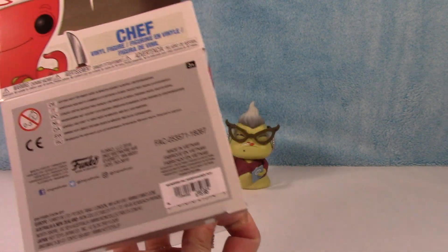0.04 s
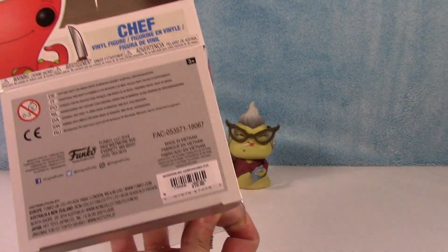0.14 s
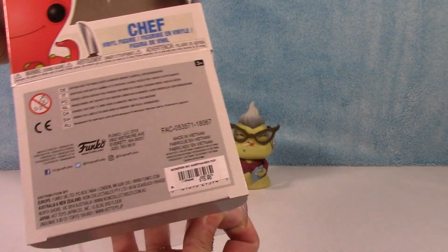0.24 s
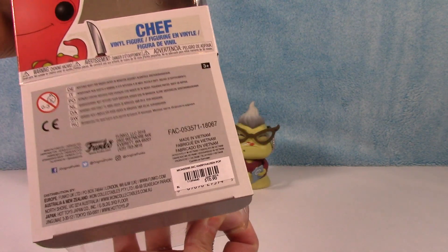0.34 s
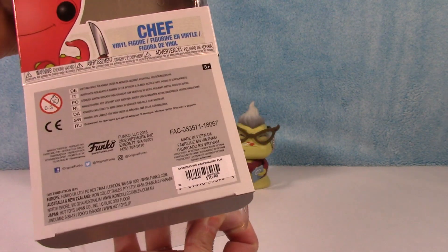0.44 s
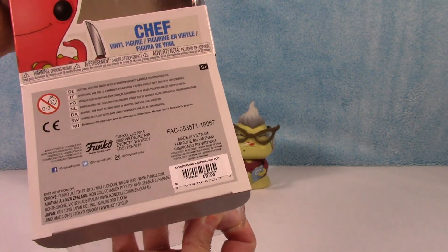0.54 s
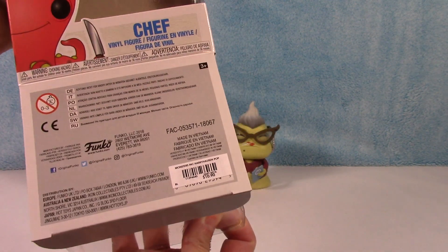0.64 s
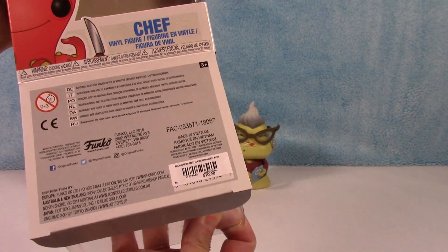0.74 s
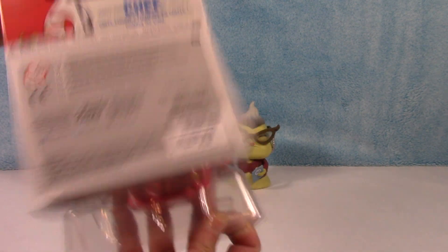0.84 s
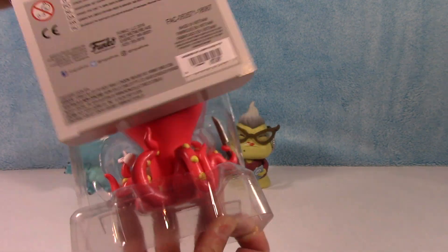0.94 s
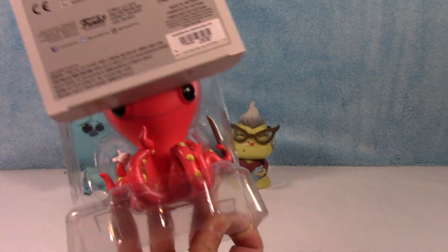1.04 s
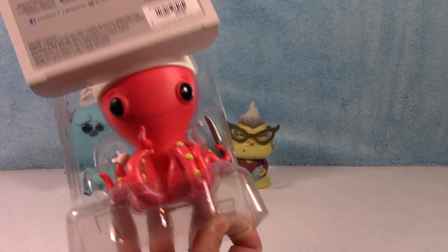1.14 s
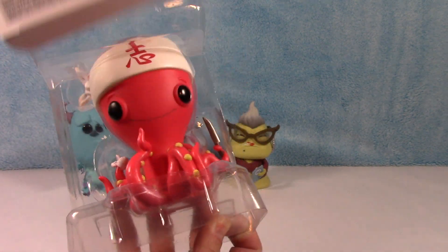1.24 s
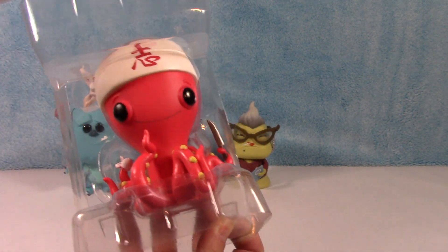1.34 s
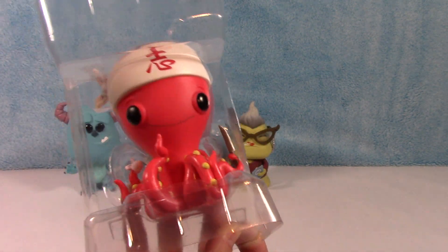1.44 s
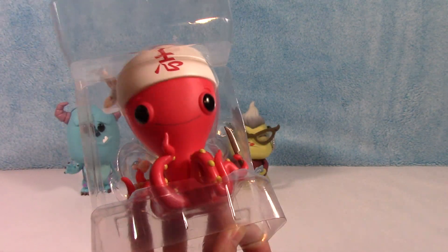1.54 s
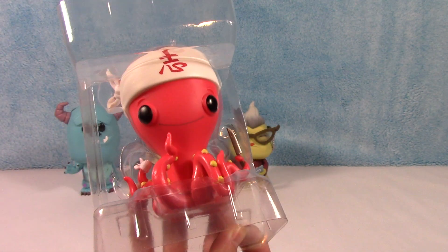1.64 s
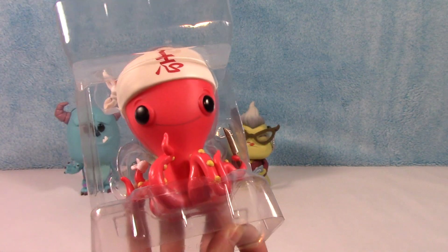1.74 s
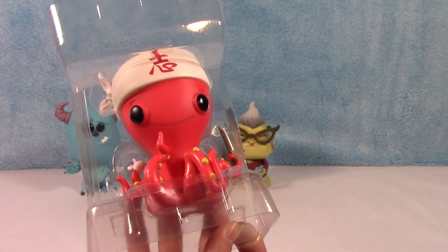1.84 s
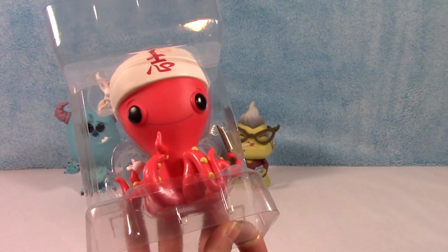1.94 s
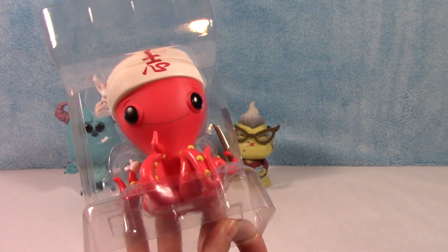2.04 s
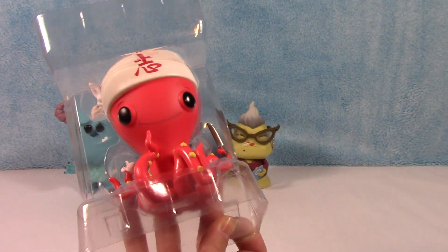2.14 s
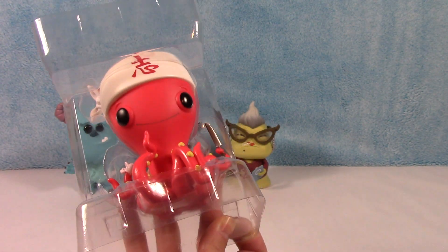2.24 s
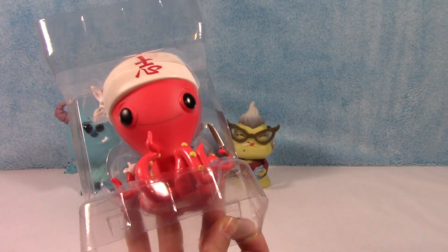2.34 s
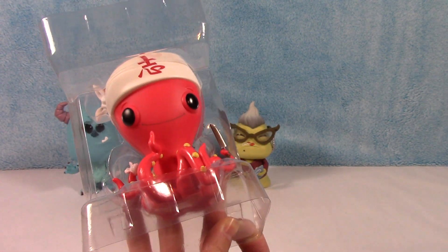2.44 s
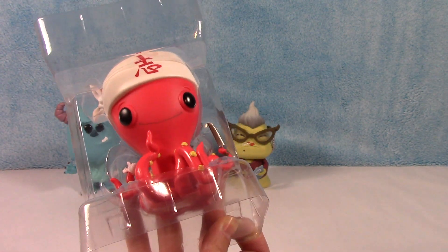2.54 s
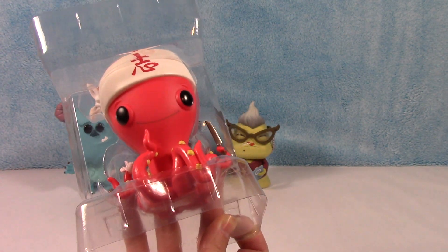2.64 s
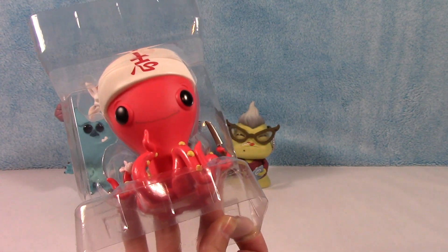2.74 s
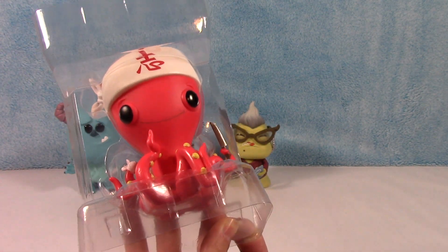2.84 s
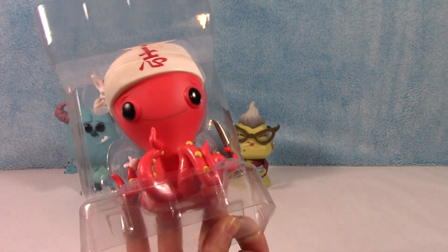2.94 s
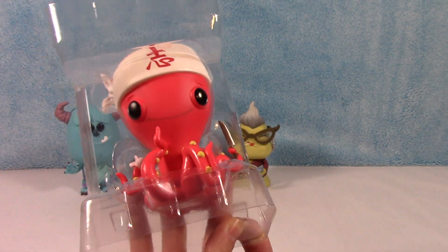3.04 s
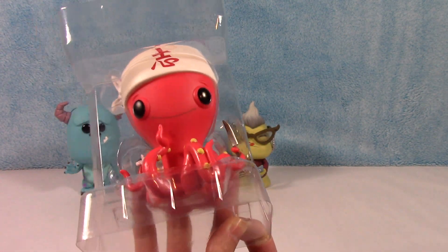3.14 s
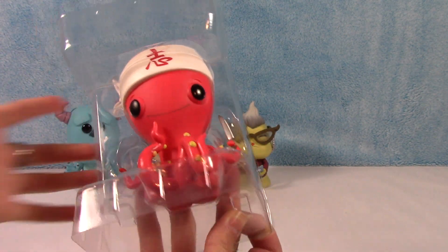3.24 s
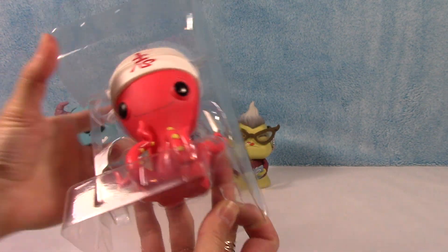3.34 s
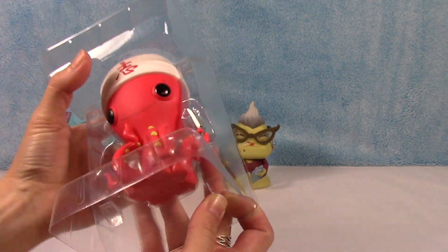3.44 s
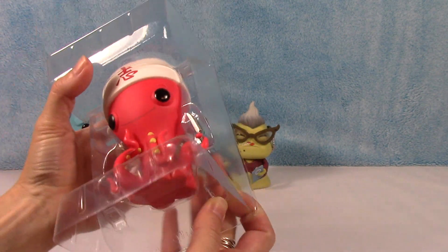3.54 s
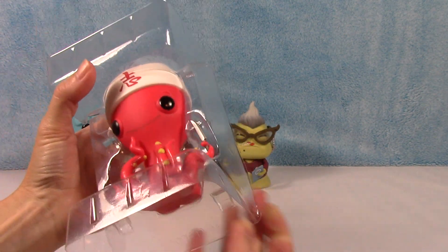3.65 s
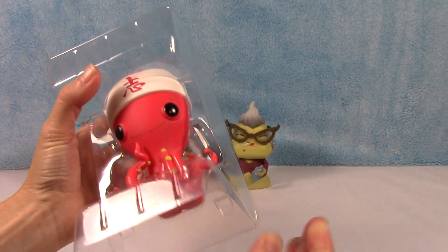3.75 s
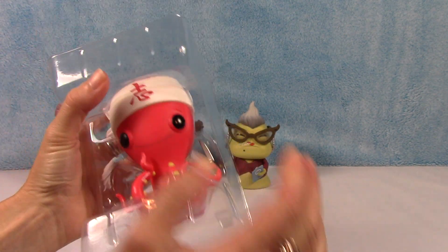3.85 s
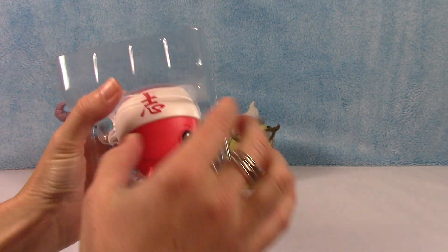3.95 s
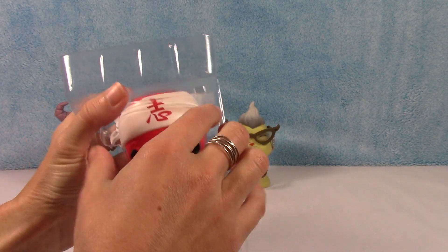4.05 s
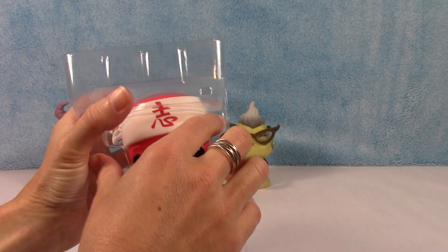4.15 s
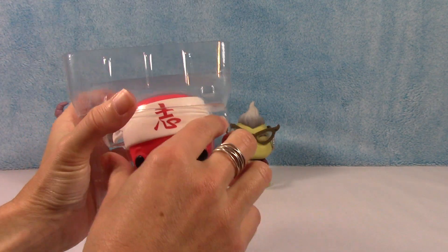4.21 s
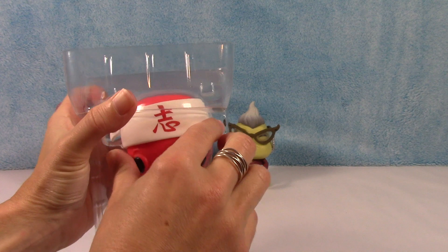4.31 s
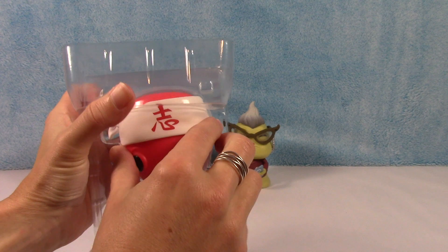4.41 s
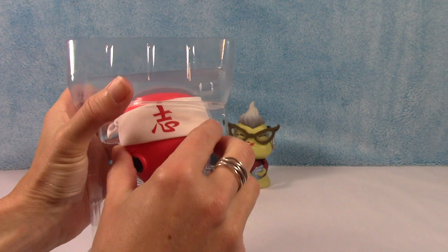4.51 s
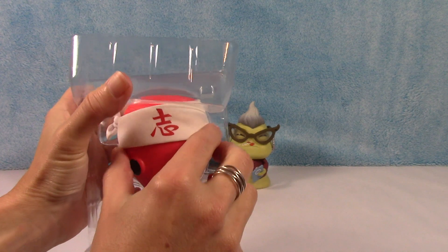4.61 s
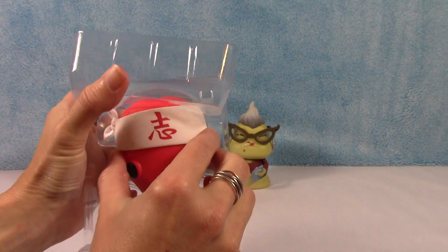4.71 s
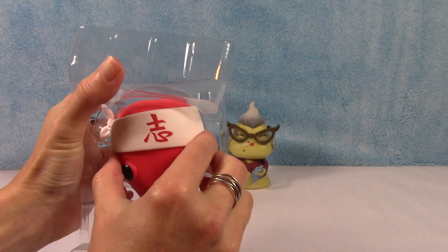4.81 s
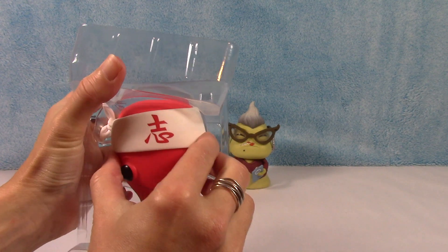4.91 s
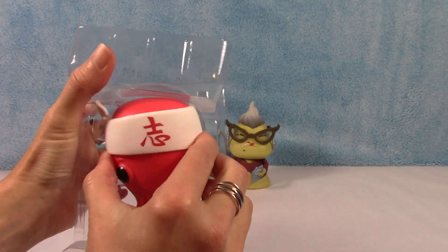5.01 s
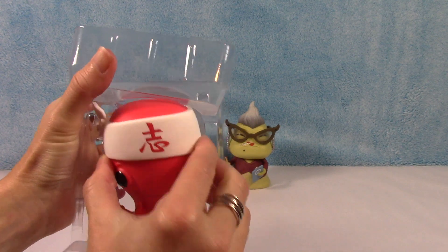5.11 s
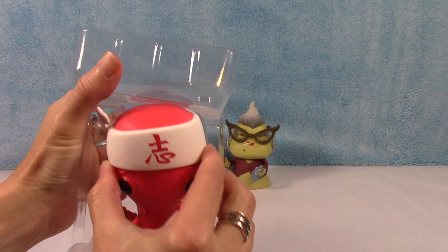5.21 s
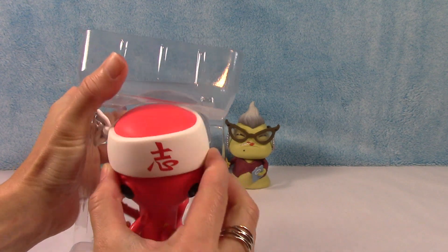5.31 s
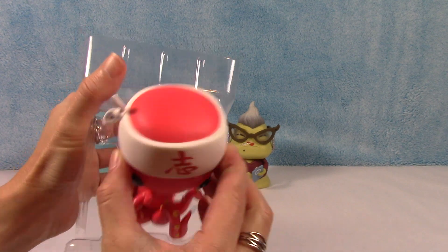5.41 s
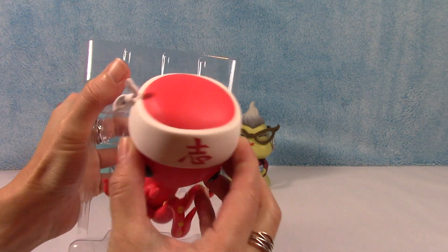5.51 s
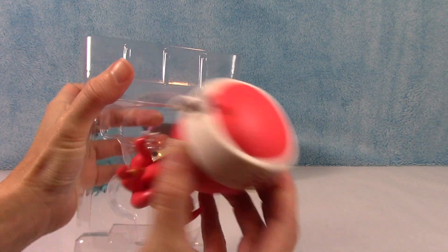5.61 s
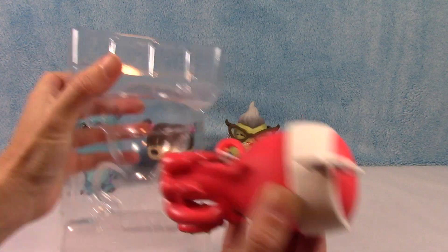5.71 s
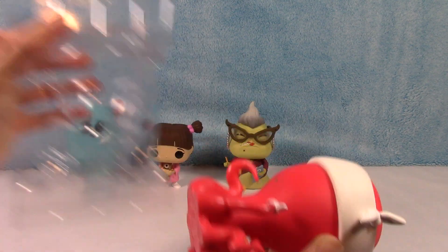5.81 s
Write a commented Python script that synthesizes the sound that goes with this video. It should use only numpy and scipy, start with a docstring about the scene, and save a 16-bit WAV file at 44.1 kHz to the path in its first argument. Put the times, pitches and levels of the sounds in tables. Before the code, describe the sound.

Thin plastic tray crackles and rasps out of a cardboard box with a hoarse squeak, pauses quietly, then pops and snaps as something is pried loose.

```python
"""Unpacking a plastic tray

A thin clear plastic tray is slid out of a cardboard box, turned in the hands, and a vinyl figure is pried out of it.
Buckling walls snap as damped bending waves, and stick-slip runs of the same flicks make the tray chatter.
Filtered random impulses make crinkle, the box's rasp and rubbing skin; a gliding sine squeaks; damped modes knock.
All of it is close and nearly mono, with decaying noise as the echo of a small room and a steady, quiet hush.
"""
import sys
import numpy as np
from scipy import signal
from scipy.fft import rfft, irfft, next_fast_len
from scipy.io import wavfile
from scipy.ndimage import map_coordinates

SR = 44100
rng = np.random.default_rng(int(sys.argv[2]) if len(sys.argv) > 2 else 0)


def file_out(sig):
    """Save sig as 16-bit WAV at sys.argv[1]."""
    # one column per channel
    cols = np.atleast_2d(sig).T
    # limit, then scale
    lim = np.clip(cols, -1, 1)
    pcm = np.round(lim * 32767).astype(np.int16)
    wavfile.write(sys.argv[1], SR, pcm)


N = 258849
TIME = np.arange(N) / SR
RING = TIME[:SR // 8]  # time axis of one flick or knock [s]


def amp(db):
    """Logarithmic level: decibels become an amplitude gain."""
    return 10 ** (np.asarray(db) / 20)


def unit(x):
    """Normalisation: scale to a root-mean-square of 1."""
    return x / np.sqrt(np.mean(x ** 2) + 1e-20)


def along(points, hz):
    """Interpolation of (frequency, value) points on a logarithmic frequency axis."""
    f, v = np.transpose(points)
    return np.interp(np.log(hz + 1), np.log(f + 1), v)


def level(rows):
    """Amplitude envelope: gain per sample from (time, .., level) rows, silent outside them."""
    rows = np.asarray(rows)
    s, db = rows[:, 0], rows[:, -1]
    inside = np.interp(TIME, s, np.ones(len(rows)), 0, 0)
    return inside * amp(np.interp(TIME, s, db))


def wobble(rate):
    """Random modulation: a smooth curve through `rate` random knots a second."""
    knots = rng.standard_normal(int(N * rate / SR) + 4)
    return map_coordinates(knots, [TIME * rate])


def add(track, s, x):
    """Superposition: mix x into the track at time s."""
    part = track[max(0, round(s * SR)):][:len(x)]
    part += x[:len(part)]


def colour(x, gain, size=2048):
    """Minimum-phase filtering: the causal response is found by folding the cepstrum of the gain."""
    cepstrum = irfft(np.log(np.maximum(gain(np.fft.rfftfreq(size, 1 / SR)), 1e-6)))
    cepstrum[1:size // 2] *= 2
    cepstrum[size // 2 + 1:] = 0
    response = irfft(np.exp(rfft(cepstrum)))
    return signal.fftconvolve(x, response)[:len(x)]


def shaped(x, spectrum):
    """Spectral shaping: x passes a filter given as (frequency, level) points."""
    return colour(x, lambda hz: amp(along(spectrum, hz)))


def band(x, hz, kind):
    """Band selection by a third-order Butterworth filter."""
    return signal.sosfilt(signal.butter(3, hz, kind, fs=SR, output="sos"), x)


def registers(x):
    """Band splitting: thud, ring, bite and crack, the four registers of a plastic sound."""
    edges = [([165, 600], "band"), ([600, 1800], "band"), ([1800, 4000], "band"), (4000, "high")]
    return [band(x, hz, kind) for hz, kind in edges]


def balance(parts, levels_db, count):
    """Register balance: each part is scaled by its spread over the first `count` samples, then summed."""
    return sum(g * p / np.std(p[:count]) for g, p in zip(amp(levels_db), parts))


def resonances(peaks, hz):
    """Resonance: power sum of second-order (centre, width, level) band-pass responses, as a gain."""
    return np.sqrt(sum(np.abs(amp(db) * hz * w / (c * c - hz * hz + 1j * hz * w)) ** 2 for c, w, db in peaks))


def ringing(modes, detune=0.048):
    """Modal decay: damped sines, each drawn a little differently in level and pitch every time."""
    out = np.zeros(len(RING))
    for hz, db, t60 in modes:
        decay = amp(db + rng.normal(0, 1.6) - 60 * RING / t60)
        out += decay * np.sin(2 * np.pi * hz * rng.normal(1, detune) * RING)
    return out


def dying_noise(t60s, count, size):
    """Frequency-dependent damping: noise of energy 1 in which each frequency dies at its own speed."""
    hz, t, z = signal.stft(rng.standard_normal(count), SR, nperseg=size)
    decay = amp(-60 * t / along(t60s, hz)[:, None])
    tail = signal.istft(z * decay, SR, nperseg=size)[1][:count]
    return tail / np.linalg.norm(tail)


def grains(rate, spread_db):
    """Impulse noise: random tiny impulses, `rate` a second on average, of uneven size and either sign."""
    present = rng.random(N) < rate / SR
    sizes = amp(spread_db * np.minimum(rng.standard_normal(N), 2))
    return present * rng.choice([-1, 1], N) * sizes


# spectrum of the quiet room: (frequency [Hz], relative level per Hz [dB])
QUIET = [(15, -45), (25, -11), (53, -15.5), (212, -2.5), (427, -7.5), (591, -9), (1160, -13.5), (1370, -13),
         (2350, -18.5), (6560, -25.5), (14800, -36), (16000, -44)]


def hush(db=-58.0):
    """Stationary noise: the steady hush of the room is shaped white noise."""
    return amp(db) * unit(shaped(rng.standard_normal(N), QUIET))


# [s] snaps and scrapes before this time sound boxed, later ones free; crinkle keeps the boxed colour
OUT_OF_BOX = 1.5
# decay time of bending waves in the sheet: (frequency [Hz], t60 [s])
SHEET_T60 = [(250, 0.16), (1200, 0.039), (3000, 0.033), (8000, 0.021), (15000, 0.013)]
# tray against cardboard: (frequency [Hz], relative level per Hz [dB])
BOXED = [(40, -45), (110, -15), (240, -9.5), (420, -8), (570, 0), (880, -4), (1400, 0.5), (2000, -5),
         (2700, -2.5), (4700, -15), (7800, -14.5), (12000, -24), (16000, -37.5)]
# smooth response of the bare tray: (frequency [Hz], relative level per Hz [dB])
FREE = [(40, -40), (110, -22), (250, -6), (600, -3), (1300, 0), (2400, -3), (4000, -11), (8000, -13),
        (12000, -22), (16000, -30)]
# resonances of the tray over its smooth response: (centre [Hz], width [Hz], level [dB])
TRAY = [(299.7, 51, 6.5), (736, 140, 5), (1035.2, 130, 4.5), (1195.5, 140, 7), (1475.4, 72, 4.5),
        (1750, 160, -2), (2085, 427, 1), (2550, 138, 1), (3476, 220, 5.5), (4920, 780, 2.5),
        (6174, 1200, 1), (7250, 560, 1.5), (9600, 1200, 2)]


def sheet(s, flutter=1.0, crack_t60=0.0068):
    """Bending waves: a flick is a short crack, then waves that scatter over the sheet and its resonances."""
    crack = rng.standard_normal(len(RING)) * amp(-60 * RING / crack_t60)
    flick = crack / np.linalg.norm(crack) + flutter * dying_noise(SHEET_T60, count=len(RING), size=64)
    if s < OUT_OF_BOX:  # the cardboard damps the tray's own resonances
        return shaped(flick, BOXED)
    return colour(flick, lambda hz: amp(along(FREE, hz)) * np.hypot(1, resonances(TRAY, hz)))


ATTACK_S, SAG_DB = 0.016, 3  # a move builds up, then eases while it is held
CRINKLE_RELEASE_S, RUB_RELEASE_S = 0.019, 0.042  # the plastic settles sooner than the fingers


def effort(start, end, release_s):
    """Force envelope: the gain of one move, with a quick build-up, a sagging hold and a release."""
    outside = np.maximum(start - TIME, 0) / ATTACK_S + np.maximum(TIME - end, 0) / release_s
    held = np.clip((TIME - start) / max(end - start, .01), 0, 1)
    return np.exp(-outside) * amp(-SAG_DB * held)


# each push or pull of the hands strains the plastic and drags skin over it:
# (start [s], end [s], relative crinkle level [dB], relative rub level [dB])
MOVES = [(0, 0.008, -35, -48), (0.097, 0.235, -27.5, -38), (.35, 0.41, -43.5, -33.5),
         (.54, 0.614, -38.5, -37.5), (0.798, 0.954, -19, -39), (1.02, 1.204, -28, -38),
         (1.308, 1.429, -37.5, -32.5), (2.876, 3.06, -61, -39), (3.254, 3.325, -65, -42),
         (3.424, 3.575, -42.5, -41.5), (4.299, 4.44, -46, -39), (4.484, 4.82, -32, -36.5),
         (4.969, 5.083, -24, -57), (5.13, 5.241, -33, -47), (5.304, 5.446, -22, -39)]


def crinkle(db=-2, count=8):
    """Strain release: between the snaps, plastic ticks finely at several spots of different colour."""
    spots = np.zeros(N)
    for _ in range(count):
        ticks = grains(rate=52, spread_db=12.0)
        spots += signal.fftconvolve(ticks, unit(sheet(0, flutter=0.68)))[:N]  # always the boxed colour
    strain = sum(amp(crinkle_db) * effort(start, end, CRINKLE_RELEASE_S) for start, end, crinkle_db, _ in MOVES)
    return amp(db) * unit(spots) * strain


# skin rubbing over the pack: (frequency [Hz], relative level per Hz [dB])
RUB = [(24, -80), (40, -33), (234, -5.5), (352, 1), (484, -8.5), (530, -4), (1230, -11), (1340, -13),
       (1800, -18), (2590, -19.5), (9000, -42.5), (11700, -71), (19800, -120)]
# skin gliding on smooth plastic: (frequency [Hz], relative level per Hz [dB])
GLIDE = [(2500, -12), (4000, -8), (5300, 4.5), (7500, -6.5), (10000, -14), (16000, -25)]
# fingers glide on smooth plastic: (time [s], level [dB])
SKIN = [(3.19, -72), (3.26, -48), (3.32, -44.5), (3.38, -48.5), (3.5, -52.5), (3.68, -68.5), (3.77, -57.5),
        (3.83, -66)]


def fingers(rub_db=-1):
    """Sliding friction: soft skin judders over the pack with each move, or hisses where it glides."""
    rub = unit(shaped(grains(rate=860, spread_db=0.5), RUB) * amp(0.75 * wobble(40)))
    glide = unit(shaped(rng.standard_normal(N), GLIDE) * amp(1.2 * wobble(50)))
    grip = sum(amp(db) * effort(start, end, RUB_RELEASE_S) for start, end, _, db in MOVES)
    return amp(rub_db) * rub * grip + glide * level(SKIN)


# reverberation time of the room: (frequency [Hz], t60 [s])
ROOM_T60 = [(200, 0.37), (1500, 0.29), (5000, 0.35), (14000, 0.14)]
# tone of the room's answer: (frequency [Hz], relative level [dB])
ROOM_TONE = [(150, -1.5), (1100, 1.5), (2400, -0.5), (6000, -1.5), (14000, 0)]


def room(x, count=SR // 2, size=8192):
    """Reverberation: a diffuse echo from fresh random tails, cross-faded at regular intervals."""
    out = np.zeros(N)
    build_up = 1 - np.exp(-(TIME[:count] / 0.0042) ** 2)  # the walls answer after a few milliseconds
    for i in range(0, N + size, size):
        tail = dying_noise(ROOM_T60, count=count, size=256) * build_up
        share = np.clip(1 - np.abs(np.arange(N) - i) / size, 0, 1)  # cross-fade between tails
        first = max(0, i - size)
        add(out, first / SR, signal.fftconvolve((x * share)[first:i + size], tail))
    return shaped(out, ROOM_TONE)


# the broad walls flap slowly: (mean frequency [Hz], mean relative level [dB], t60 [s])
WALLS = [(246, -9.5, 0.14), (301.3, -0.5, 0.059), (406.3, -2.5, .11)]


def flap(attack=0.0025):
    """Low plate modes: the broad walls swing slowly, scaled to unit spread over the first 10 ms."""
    swing = registers(ringing(WALLS) * (1 - np.exp(-RING / attack)))[0]
    return swing / np.std(swing[:SR // 100])


# a snap's other registers: (thud [dB], bite [dB]), before the adjustments in snaps()
BOXED_SNAP, FREE_SNAP = (-15.5, -7), (-19.5, -3.5)
# small patches and sharp cracks bite harder
BITE_DB_PER_OCTAVE, BITE_FOLLOWS_CRACK = 3.5, .2
USUAL_RING_HZ, USUAL_CRACK_DB = 1300, -12
LOOSE_THUD_DB = -6  # a wall that springs back untouched hardly moves the whole pack
# sharp snaps of the tray: buckling walls, catches on the box and knocks of the figure: # (time [s], relative
# level [dB], centre of the ring [Hz], crack level within the snap [dB])
SNAPS = [(.034, -10, 1090, -14), (.066, -22.5, 650, -6.5), (.088, -9, 1320, -21), (.162, -11.5, 1550, -18),
         (.187, -13, 1030, -7.5), (.218, -8, 1240, -16), (.279, -19.5, 1100, -22),
         (.327, -5.5, 1140, -13.5), (.397, -9.5, 950, -10.5), (.461, -8.5, 640, -17.5),
         (.509, -12.5, 1000, -7.5), (.575, -5.5, 620, -16.5), (.634, -18, 1130, -38.5),
         (.729, -26, 1050, -7), (.761, -6.5, 1410, -12.5), (.788, -10, 970, -26), (.801, -1, 1390, -14.5),
         (.895, 0, 1180, -22), (.94, -7.5, 2350, -30.5), (.962, -5.5, 2600, -29.5),
         (1.037, -17.5, 2330, -4), (1.103, -5, 2630, 3.5), (1.169, -8, 2890, -6.5),
         (1.181, -6.5, 1200, -8.5), (1.224, -10.5, 1735, -7), (1.278, -0.5, 590, -12.5),
         (1.347, -10, 590, -14), (1.374, -5, 620, -23), (1.571, -11.5, 1440, -7.5),
         (3.028, -12.5, 2260, -5), (3.084, -15, 950, -2), (3.399, -12, 970, -11),
         (3.424, -14.5, 1440, -10.5), (3.461, -19.5, 960, -1.5), (3.481, -21, 980, -10),
         (3.496, -9.5, 1010, -8.5), (3.556, -17.5, 630, -25.5), (3.564, -15, 780, -5),
         (3.582, -23.5, 3400, -3),  (3.626, -7, 2270, -13.5), (3.828, -30, 736, -13.5),
         (3.845, -30.5, 740, -1.5), (3.884, -5.5, 1240, -14.5), (4.012, -2.5, 1195, -17),
         (4.23, -28, 1090, -21), (4.268, -6, 1240, -12.5), (4.28, -19, 2600, 3.5), (4.348, -17.5, 735, -29),
         (4.374, -18.5, 706, -20.5), (4.395, -0.5, 1190, -12), (4.437, -12, 1020, -7),
         (4.473, -11.5, 1930, -3.5), (4.491, -3, 725, -7.5), (4.511, -9, 2160, -9), (4.53, -5, 1100, -9.5),
         (4.557, -2, 1280, -13), (4.583, -4, 1460, -12), (4.624, -1.5, 1460, -9.5), (4.663, 0, 1570, -9.5),
         (4.697, -9.5, 1940, -4.5), (4.712, -8.5, 1560, -24.5), (4.757, 0.5, 1333, -12.5),
         (4.774, -11, 1910, -11), (4.794, -8.5, 1685, -12.5), (4.822, -7.5, 1770, -21.5),
         (4.937, -20.5, 701.8, -10), (4.944, 0.5, 900, -32), (4.951, 2, 1180, -14.5),
         (4.971, 0, 1200, -16.5), (5.02, -9, 1610, -7.5), (5.037, -5.5, 1680, -6.5),
         (5.077, -10, 1690, -0.5), (5.093, -17.5, 1788, -11.5), (5.144, -14, 760, -24.5),
         (5.167, -7, 1710, -5), (5.211, -6.5, 2120, -12.5), (5.239, -17, 770, -1), (5.286, -6, 1080, -4),
         (5.327, -11.5, 2540, -2), (5.341, -5, 1195, -8.5), (5.348, -3.5, 1200, -5), (5.367, -3, 1760, -4),
         (5.618, -5, 1110, -3.5), (5.729, -22.5, 1206, -6.5), (5.74, -9.5, 810, -15.5),
         (5.797, 0.5, 1150, -7.5), (5.807, -13.5, 1510, -7)]
# a broad wall gives way and flaps: (time [s], level [dB])
FLAPS = [(1.181, -25.5), (2.916, -35), (3.027, -31), (3.217, -37.5), (3.37, -40), (4.348, -37.5),
         (4.491, -30.5), (4.946, -26.5), (5.126, -33), (5.618, -29), (5.797, -22)]


def snaps(ring_db=-14, thud_db=-9, bite_db=-10, crack_db=-12, focus_db=6, octaves=0.14, flapping=0.51):
    """Buckling: the size of each patch sets its pitch and bite; boxed or gripped it sounds heavier."""
    out = np.zeros(N)
    gripped = np.max([effort(start, end, RUB_RELEASE_S) for start, end, _, _ in MOVES], axis=0)
    for s, db, centre_hz, crack in SNAPS:
        thud, bite = BOXED_SNAP if s < OUT_OF_BOX else FREE_SNAP
        thud += LOOSE_THUD_DB * (1 - gripped[int(s * SR)])
        bite += BITE_DB_PER_OCTAVE * np.log2(centre_hz / USUAL_RING_HZ)
        bite += BITE_FOLLOWS_CRACK * (crack - USUAL_CRACK_DB)
        patch = lambda hz: amp(focus_db * np.exp(-(np.log2((hz + 1) / centre_hz) / octaves) ** 2))
        parts = registers(colour(sheet(s), patch))
        parts[0] = unit(parts[0]) + flapping * unit(flap())  # the whole wall flaps with the thud
        levels_db = [thud + thud_db, ring_db, bite + bite_db, crack + crack_db]
        add(out, s, amp(db) * balance(parts, levels_db, SR // 100))
    for s, db in FLAPS:
        add(out, s, amp(db) * flap())
    return out


SLOWING = .77  # slip rate at the end of a scrape over that at its start
# the tray sticks and slips: (start [s], end [s], relative level [dB],
# approximate slip rate at the start [1/s], crack level within the scrape [dB])
SCRAPES = [(.097, 0.166, -28, 380, -6), (.359, 0.38, -33, 240, -9), (0.579, 0.598, -35, 430, -4.5),
           (.815, .843, -11.5, 400, -4), (.849, .863, -10, 450, -4.5), (0.87, 0.927, -17.5, 335, -11.5),
           (0.93, 0.947, -10, 460, -20), (1.101, 1.144, -16.5, 350, -16.5), (1.287, 1.321, -26, 310, -5.5),
           (4.773, 4.837, -22.5, 125, -5.5), (4.976, 5.032, -16.5, 330, -6), (5.195, 5.245, -22, 180, -7),
           (5.405, 5.429, -14.5, 640, -8), (5.444, 5.468, -23, 280, -16)]


def scrapes(jitter=.28, scatter_db=2.5, thud_db=-11, ring_db=-2.0, bite_db=-2.0, variety=0.82):
    """Stick-slip friction: tiny slips at an uneven, slowing rate each flick the sheet."""
    out = np.zeros(N)
    for start, end, db, rate_in, crack in SCRAPES:
        span, rate_out = end - start, SLOWING * rate_in
        count = round(span * (rate_in + rate_out) / 2)
        gaps = np.exp(jitter * rng.standard_normal(count)) / np.linspace(rate_in, rate_out, count)
        slip_times = span * (np.cumsum(gaps) - gaps) / gaps.sum()
        slip = lambda: sheet(start, flutter=0.94, crack_t60=0.0036)
        run, common = np.zeros(int(span * SR) + len(RING)), slip()
        for s in slip_times:
            strength = amp(scatter_db * rng.standard_normal())
            add(run, s, strength * (common + variety * slip()))
        levels_db = [thud_db, ring_db, bite_db, crack]
        add(out, start, amp(db) * balance(registers(run), levels_db, int(span * SR)))
    return out


# modes of the pack as a box: (mean frequency [Hz], mean relative level [dB], t60 [s])
HOLLOW = [(198.4, -5.5, 0.11), (330, -7, 0.088), (582, -1.5, 0.068), (641, 3.5, 0.066)]
# fingers and figure knock softly on the hollow pack: (time [s], relative level [dB])
KNOCKS = [(0.713, -26.5), (1.112, -7.5), (1.347, -43), (1.377, -13), (1.419, -23), (1.434, -20),
          (1.474, -24.5), (1.721, -38), (2.031, -41.5), (2.079, -44), (2.152, -40.5), (2.187, -43),
          (2.519, -40.5)]
# short low thumps near 72 Hz: (time [s], mean level [dB])
THUMPS = [(.833, -47), (0.939, -40), (1.103, -45), (1.383, -48), (2.358, -60.5), (4.756, -31.5)]


def knocks(knock_db=-5, thump_hz=72, attack=0.0021):
    """Modal excitation: soft contacts ring the hollow pack; short low thumps are one quickly damped mode."""
    out = np.zeros(N)
    soft = 1 - np.exp(-RING / attack)
    for s, db in KNOCKS:
        add(out, s, amp(db + knock_db) * soft * ringing(HOLLOW))
    for s, db in THUMPS:
        add(out, s, amp(db) * soft * ringing([(thump_hz, 0, .06)]))
    return out


# resonances of the cardboard: (centre [Hz], width [Hz], relative level [dB])
CARD = [(570, 110, -18.5), (1080, 130, -15), (1670, 140, 4), (2390, 280, 9.5), (2730, 370, 0),
        (3300, 300, -19.5)]
# the tray slides along the box wall: (time [s], level [dB])
SLIDE = [(.78, -53), (.82, -21), (.95, -29.5), (.98, -29.5), (1.05, -34), (1.09, -21.5), (1.13, -33),
         (1.16, -34), (1.22, -56.5)]
# a tray edge squeaks on the card: (time [s], mean frequency [Hz], level [dB])
SQUEAK = [(.96, 2446, -42.5), (1.02, 2335, -23.5), (1.06, 2288, -49.5), (1.106, 2515, -32.5),
          (1.117, 2647, -20), (1.135, 3094, -12), (1.146, 3203, -55)]


def box():
    """Rough-surface friction: the tray rasps along the card, and one edge squeaks hoarsely in short catches."""
    rasp = unit(colour(grains(rate=1200, spread_db=3.5), lambda hz: resonances(CARD, hz)))
    s, hz, _ = np.transpose(SQUEAK)
    pitch = np.interp(TIME, s, hz) * (1 + .13 * wobble(700))  # fast random shifts make it hoarse
    catches = amp(6 * wobble(450))
    squeak = unit(np.sin(2 * np.pi * np.cumsum(pitch) / SR) * catches)
    return rasp * amp(3.7 * wobble(70)) * level(SLIDE) + squeak * level(SQUEAK)


# a hand lands on the pack and scuffs it:
# (time [s], length of the fade [s], level [dB], hiss over the drag [dB])
SCUFFS = [(2.341, 0.042, -51, -11.5), (2.39, .14, -56.5, -23), (2.704, 0.098, -28.5, -27),
          (2.763, 0.034, -23.5, -19.5), (2.795, 0.055, -31.5, -26.5), (2.884, 0.084, -37, -32),
          (3.035, 0.14, -39.5, -23), (3.21, 0.023, -36.5, -27), (3.37, 0.033, -38, -16.5),
          (4.378, 0.013, -33.5, -24.5)]


def scuffs(attack=0.0043, fade_db=7, judder_db=5):
    """Transient friction: skin catches at once, drags in small jerks and lets go."""
    out, t = np.zeros(N), TIME[:SR // 3]
    for s, length, db, hiss_db in SCUFFS:
        drag = unit(shaped(grains(rate=1200, spread_db=judder_db)[:len(t)], RUB))
        hiss = unit(registers(shaped(rng.standard_normal(len(t)), BOXED))[-1])
        envelope = amp(db - fade_db * (t / length) ** 3) * (1 - np.exp(-t / attack))
        add(out, s, envelope * (drag + amp(hiss_db) * hiss))
    return out


SIZE = next_fast_len(N // 2 + 1024)  # half the transform length [samples]
# difference between two close capsules: (frequency [Hz], relative level [dB])
CAPSULES = [(60, -21.5), (250, -31.5), (1000, -34), (4000, -22), (12000, -19)]


def side_signal(near, echo, width_db=-2, hiss_db=-80):
    """Phase difference: two closely spaced capsules differ only slightly, mostly in the treble's phase."""
    gap = amp(along(CAPSULES, np.fft.rfftfreq(2 * SIZE, 1 / SR)))
    near_part = (.15 + 1j) * rfft(near, 2 * SIZE)  # mostly a quarter-cycle shift
    echo_part = .6 * rfft(echo, 2 * SIZE)
    side = amp(width_db) * irfft(gap * (near_part + echo_part))[:N]
    return side + amp(hiss_db) * rng.standard_normal(N)


def scene(room_db=-13.0):
    """Mid-side superposition: close, nearly mono handling and its echo over the room's steady hush."""
    near = crinkle() + fingers() + snaps() + scrapes() + knocks() + box() + scuffs()
    echo = room(near)
    mid = near + amp(room_db) * echo + hush()
    side = side_signal(near, echo)
    return np.array([mid + side, mid - side])


TOP_HZ = 16200  # band limit


def record(dry, top=0.93, hardness=5):
    """Saturation and band limiting: the loudest peaks are rounded off, and the top band is removed."""
    rounded = dry / (1 + np.abs(dry / top) ** hardness) ** (1 / hardness)
    return irfft(rfft(rounded) * (np.fft.rfftfreq(N, 1 / SR) < TOP_HZ), N)


dry = scene()
out = record(dry)
file_out(out)
```